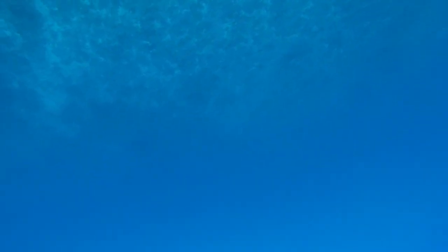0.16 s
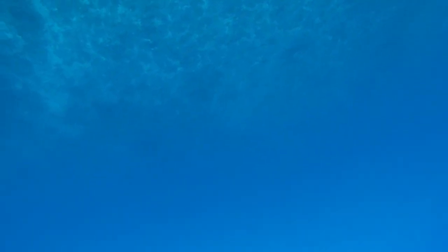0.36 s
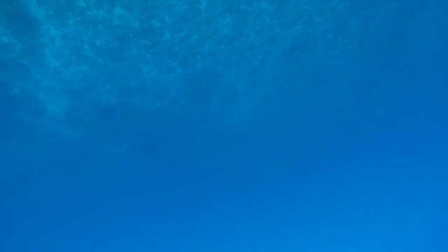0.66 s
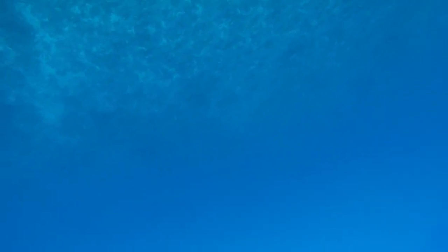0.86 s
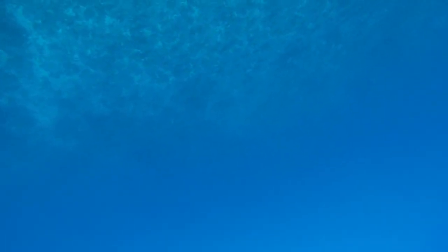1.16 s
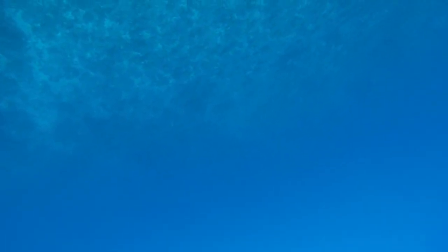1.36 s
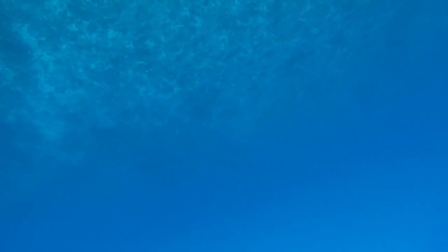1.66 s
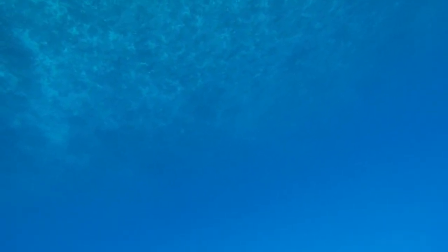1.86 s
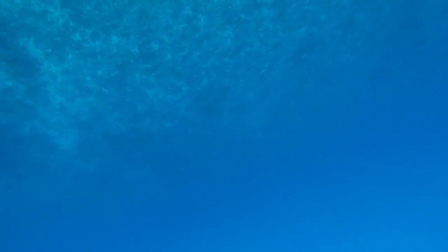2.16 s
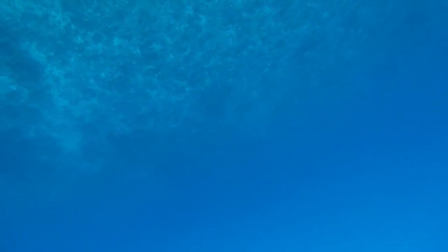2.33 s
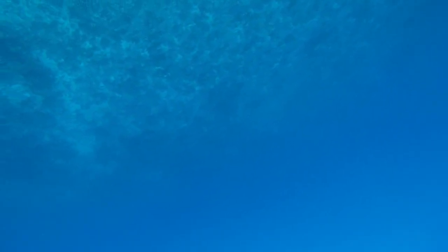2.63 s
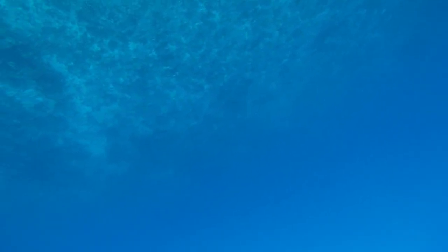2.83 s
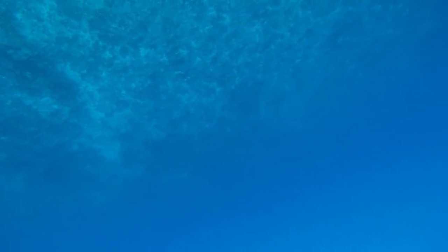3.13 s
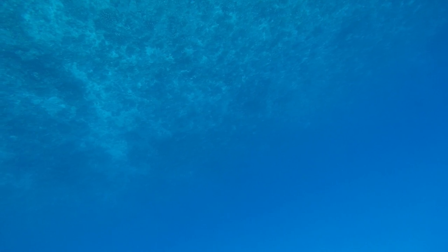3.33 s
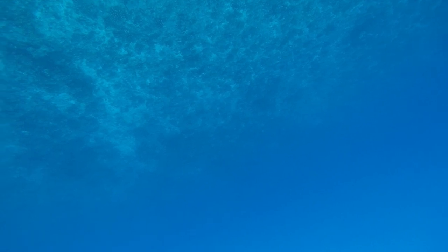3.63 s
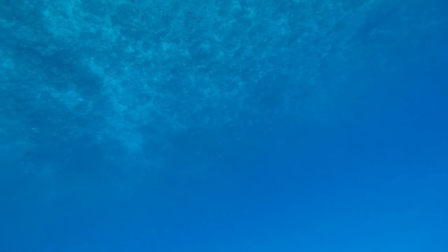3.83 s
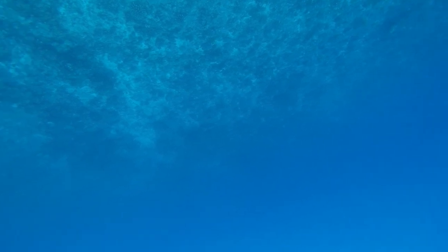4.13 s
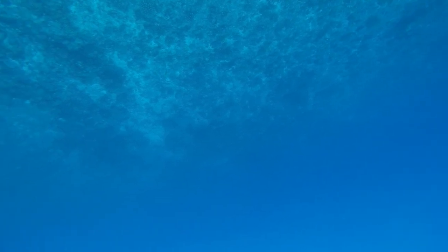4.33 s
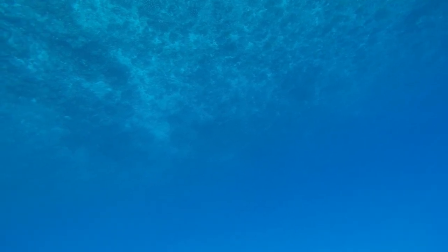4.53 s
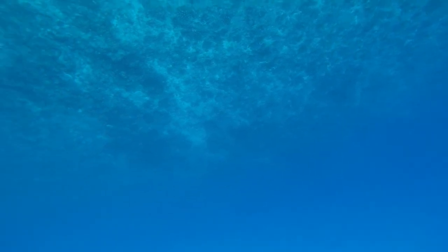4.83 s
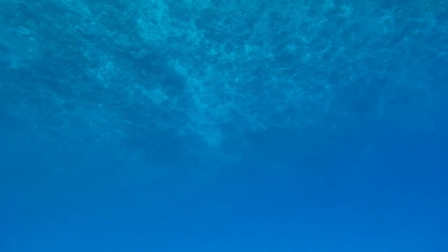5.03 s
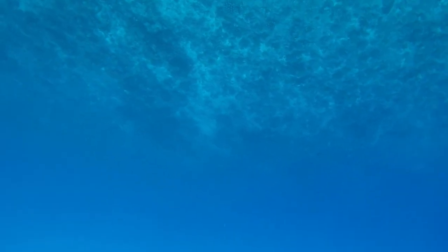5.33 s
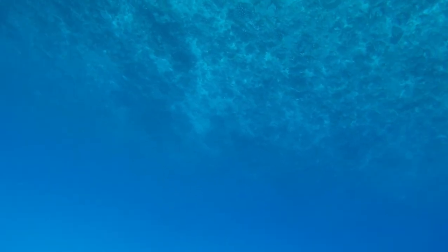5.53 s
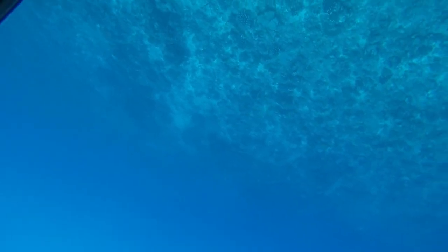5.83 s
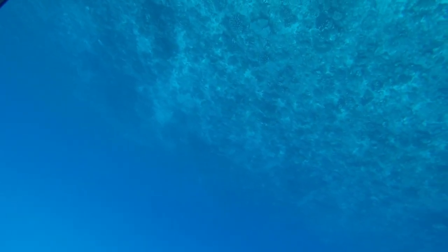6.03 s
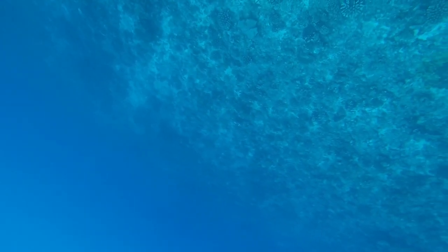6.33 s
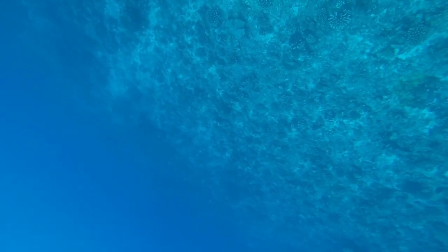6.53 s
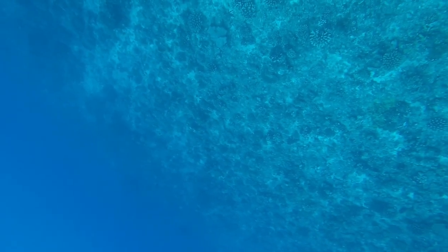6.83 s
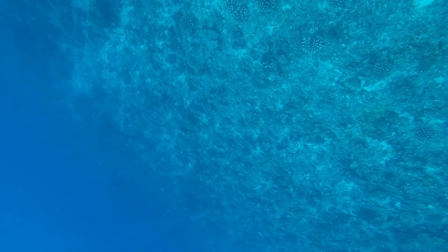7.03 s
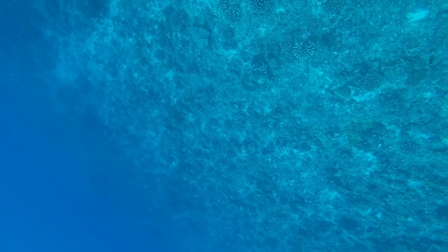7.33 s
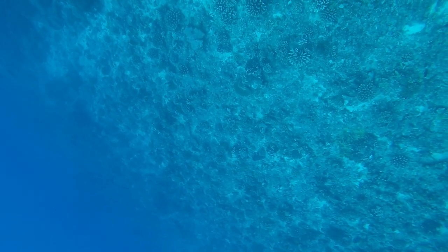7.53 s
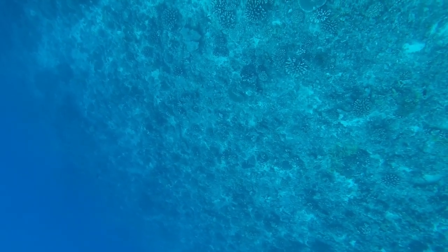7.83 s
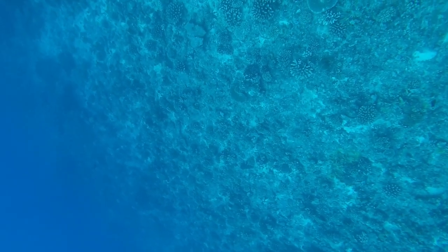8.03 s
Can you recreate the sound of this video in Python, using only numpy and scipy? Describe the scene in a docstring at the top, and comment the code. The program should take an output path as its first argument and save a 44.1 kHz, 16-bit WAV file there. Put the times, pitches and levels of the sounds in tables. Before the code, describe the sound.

Underwater beside a reef, heard from inside a sealed housing. Deep rumbling flow and dull falling glugs come first, over a constant fine crackle of snapping shrimp. The rumble sinks away, leaving crackle and sharp little ticks. Past five seconds, air squeals and hisses through a narrow gap, bursts in a hard ringing pop, and squeaks on. A short low hoot and more glugs follow as the rumble partly returns.

```python
"""Under water beside a reef, inside a camera housing: filtered noise rumbles past as flow, and trapped air
glugs against the case in damped, falling tones. Snapping shrimp crackle all around in short noise bursts.
Air squeezes through a narrow gap in hissing squeals, wavering tones that roughen as their pitch rises.
It lets go with a ringing pop and later leaves in a short low hoot; a limiter ducks the crackle after the pop."""
import sys
import numpy as np
from scipy import signal
from scipy.fft import rfft, irfft, next_fast_len
from scipy.io import wavfile
from scipy.ndimage import uniform_filter1d, minimum_filter1d

SR = 44100
rng = np.random.default_rng(int(sys.argv[2]) if len(sys.argv) > 2 else 0)


def waveform_to_disk(signal):
    """Save audio, clipped to [-1, 1], as 16-bit WAV at the path in sys.argv[1]."""
    frames = np.transpose(np.atleast_2d(signal))
    scaled = np.clip(frames, -1, 1) * 32767
    samples = np.round(scaled).astype(np.int16)
    wavfile.write(sys.argv[1], SR, samples)


N = 360738

# In spectra, density_db is the relative level per Hz.
# likeness of left and right in steady noise: freq_hz, correlation
STEREO_LIKENESS = [(20, 0.16), (300, 0.34), (1700, 1), (3000, 0), (6000, 0), (12000, 0.11)]
# water moving past the case, before a shared lift: time_s, rumble_db, churn_db
FLOW_LEVELS = [(0.0, -34.5, -40.5), (0.48, -30.5, -43.5), (0.73, -35, -45.5), (1.59, -33.5, -45.5),
               (2.89, -43, -45), (3.32, -54.5, -47.5), (4.58, -59, -42), (5.35, -44.5, -42.5),
               (6.08, -47.5, -51), (7.29, -39, -43.5), (7.65, -38, -45.5), (8.18, -44, -47.5)]
# spectrum of the deep rumble: freq_hz, density_db
RUMBLE_SPECTRUM = [(9, -2), (15, 10), (31, 7), (124, -6.5), (204, -33.5), (500, -36.5), (1100, -110)]
# spectrum of the churning: freq_hz, density_db
CHURN_SPECTRUM = [(40, -31), (120, -9), (168, 5), (215, -5.5), (300, -10.5), (450, -16.5), (750, -17),
                  (1500, -41)]
# the reef's crackle as the housing colours it: freq_hz, density_db
REEF_SPECTRUM = [(300, -22), (800, -21.5), (1200, -12), (1640, -5), (2200, -9.5), (3300, -6), (4800, -11.5),
                 (5800, -1.5), (6400, -5.5), (7200, -2.5), (9000, -7), (11000, -20), (14000, -39.5),
                 (16000, -77)]
# how strongly the reef is heard: time_s, boost_db
REEF_NEARNESS = [(0, 2), (1.6, 2.5), (3, 1), (4.2, 3), (6.3, -2), (7.2, 2.5)]
# air pockets knocked into ringing: start_s, level_db, settled_pitch_hz, t60_s
AIR_POCKETS = [(0.106, -21, 148, 0.023), (0.221, -16.5, 121, 0.027), (0.38, -12.5, 106, 0.036),
               (0.392, -6.5, 104, .025), (0.912, -5.5, 130, 0.082), (0.924, -16, 238, 0.063),
               (1.311, -7, 89, 0.057), (1.607, -16.5, 81, 0.041), (2.205, -30, 247, 0.033),
               (2.784, -13, 93, 0.053), (3.748, -28, 225, 0.034), (4.08, -28.5, 170, 0.033),
               (4.43, -25, 210, 0.027), (4.597, -13.5, 165, 0.056), (5.035, -35, 464, 0.043),
               (6.461, -27.5, 166, 0.036), (6.619, -11, 189, 0.047), (6.75, -20.5, 190, .04),
               (7.123, -5, 139, 0.089), (7.131, -17.5, 368, 0.052), (7.315, -20, 148, .03),
               (7.335, -26, 188, 0.054), (7.543, -20.5, 103, 0.037), (8.11, -27.5, 200, 0.043)]
GLUG_START_HZ = 563
GLUG_SETTLE = 0.0573  # time constant of the pitch drop, as a share of the t60
GLUG_RISE_CYCLES = 0.94
# spitting of air with two knocks, with the pop and ahead of the hoot:
# start_s, rise_s, decay_s (time constant), level_db (before the decay)
SPIT_BURSTS = [(0.221, 0.0017, 0.0037, -26.5), (0.9123, 0.0022, 0.0086, -22.5), (5.8309, 0.0012, 0.0072, 3),
               (6.74, 0.033, 0.043, -26.5)]
# spectrum of the spitting: freq_hz, density_db
SPIT_SPECTRUM = [(60, -29), (250, -12.5), (800, 6), (1500, 1), (2500, 0), (4000, -12), (12000, -42)]
# the nearest shrimp snaps: start_s, peak_db (before panning), low_body_db
NEAR_SNAPS = [(0.2217, -22, 1), (0.515, -13, -9), (1.43, -15, -12), (1.508, -10.5, -17),
              (1.659, -16.5, -1.5), (1.812, -19, -12), (2.159, -18, -33), (2.2933, -23, -17),
              (2.7254, -17.5, -4), (3.4436, -17, -28), (3.5356, -21, -14), (3.7061, -18, -13),
              (3.742, -18, -12), (4.1724, -14, -20), (4.2027, -17, -21), (5.245, -18.5, -12),
              (2.855, -16.5, -11.5), (3.057, -18, -1), (3.2543, -14.5, -22), (3.3074, -15, -20),
              (3.3622, -12, -14), (3.5667, -15, 5), (4.091, -15, -5), (4.2863, -17, -8),
              (4.366, -14.5, -28), (4.8472, -16.5, -10), (4.934, -16, -3), (5.656, -12.5, -25),
              (5.7758, -10.5, -2), (6.288, -19, -12), (6.3314, -15, -17), (6.9213, -13, -24),
              (6.9563, -17, -11), (7.0198, -13.5, -9), (7.1731, -5.5, -9.5), (7.284, -12.5, -6.5),
              (7.4782, -17, -17), (0.6492, -22, -12), (1.2256, -18, -14), (1.2771, -19, -12),
              (2.057, -20.5, -28), (4.467, -19, -34), (7.0377, -16.5, -14), (7.2735, -18, -23),
              (7.794, -15.5, -14), (7.9944, -11, -8.5), (8.151, -15, -31)]
# air buzzing through a narrow neck, mostly as a big pocket forms: start_s, length_s, level_db
NECK_BUZZES = [(0.9144, 0.023, -15.5), (1.308, .012, -29), (2.782, 0.012, -34.5), (4.596, 0.01, -27.5),
               (4.937, 0.016, -33)]
BUZZ_HZ, BUZZ_ROUGH = 1316, 0.29
# short squeaks of the gap: start_s, length_s, start_pitch_hz, sink_octaves_per_s, crest_level_db,
# roughness (0 clean, 1 all rasp)
SHORT_SQUEAKS = [(5.138, 0.078, 1940, 3, -45, 0.96), (5.298, 0.039, 4490, 3, -23, 0.7),
                 (5.321, 0.18, 4270, 0.8, -33, 0.9), (5.925, 0.088, 4720, 6, -47, .3),
                 (6.043, 0.09, 1615, -0.5, -44.5, 0.6), (6.345, 0.08, 4400, 1.5, -39, 0.9),
                 (6.512, 0.034, 1980, 2.3, -43, 0), (6.742, 0.125, 1560, 3, -34, 1.04)]
SQUEAK_CREST = 0.16  # loudest after this share of its length
SQUEAK_RISE_DB, SQUEAK_FALL_DB = 2, 1
# puffs of air hissing through the gap: start_s, length_s, level_db (before the fade), fade_db_per_s
AIR_PUFFS = [(5.266, 0.62, -31.5, 16.5), (6.696, 0.1, -39, 106)]
PUFF_RISE_S = 0.033
# spectrum of the hiss in the gap: freq_hz, density_db
GAP_SPECTRUM = [(600, -16), (1100, -4), (1450, 5), (2000, -0.5), (2600, 6), (3400, -6.5), (4200, 13),
                (4900, -8), (5500, 0.5), (7600, 1), (9000, -11.5), (13000, -22.5), (16000, -49)]
# the long squeal before the pop: time_s, pitch_hz, level_db
SQUEAL_BEFORE_POP = [(5.28, 1750, -44), (5.42, 1833, -33.5), (5.54, 1612, -43.5), (5.755, 1386, -39.5),
                     (5.77, 1757, -34.5), (5.832, 1727, -23)]
# the long squeal after the pop: time_s, pitch_hz, level_db
SQUEAL_AFTER_POP = [(6.04, 1642, -57), (6.24, 1315, -48), (6.32, 1503, -49), (6.34, 1770, -33),
                    (6.38, 2090, -28), (6.405, 1740, -28.5), (6.456, 1706, -21.5), (6.472, 1566, -34.5),
                    (6.497, 1180, -40)]
# a whistle sliding down out of the pop: time_s, pitch_hz, level_db
SLIDING_WHISTLE = [(5.845, 3420, -39.5), (5.88, 3200, -43.5), (5.93, 3010, -43), (5.965, 2570, -37),
                   (6.0, 2360, -40), (6.037, 2140, -42)]
# a higher whistle warbling after it, before a shared lift: time_s, pitch_hz, level_db
HIGH_WARBLE = [(6.035, 4280, -52), (6.041, 4060, -32), (6.051, 3690, -41.5), (6.081, 3330, -41),
               (6.111, 3070, -54), (6.129, 3407, -39.5), (6.159, 3240, -48), (6.169, 3360, -39),
               (6.187, 3088, -52), (6.211, 3170, -47), (6.256, 2950, -54)]
# a squeal is nearly clean until its pitch passes a break; this much higher it is all rasp
CALM_ROUGH, ROUGH_SPAN_HZ = 0.15, 326
POP_AT_S = 5.8324
# the air space ringing after the pop: freq_hz, level_db, t60_s
POP_MODES = [(167, 5, .17), (383, -10, .17), (2280, -4, .04)]
# a bubble swelling at the gap in three pushes: start_s, length_s, top_pitch_hz, level_db (before the fall)
BUBBLE_HOOTS = [(6.779, 0.021, 290, -27), (6.797, 0.02, 398, -15.5), (6.814, 0.099, 315.6, -2.5)]
HOOT_RISE_S, HOOT_FALL_DB = 0.004, 22.5
HOOT_HOLD = 0.44  # share of the length before pitch and level fall
HOOT_LIFT, HOOT_SAG = 0.1, 0.55  # shares of the pitch, below its top at the start and at the end
EDGE_HZ = 15900  # low-pass cutoff of the whole sound


def gain_of(db):
    """Decibels to gain."""
    return 10 ** (np.asarray(db) / 20)


def evened(x):
    """Scales to rms 1."""
    return x / np.sqrt(np.mean(x ** 2) + 1e-20)


def read(points, hz):
    """Reads a curve on a log-frequency axis."""
    f, value = np.transpose(points)
    return np.interp(np.log(hz + 1), np.log(f + 1), value)


def add(mix, s, sound):
    """Adds a sound to the mix at time s."""
    part = mix[:, max(round(s * SR), 0):][:, :sound.shape[1]]
    part += sound[:, :part.shape[1]]


def sides(pan_db):
    """Left and right gains for a level difference, left louder when positive."""
    return gain_of(np.array([[pan_db], [-pan_db]]) / 2)


def wander(size, hz):
    """A smooth random curve of about rms 1 that moves about hz times a second."""
    length = next_fast_len(SR + size)
    f = np.fft.rfftfreq(length, 1 / SR)
    smooth = rfft(rng.standard_normal(length)) * np.exp(-(f / hz) ** 2)
    return evened(irfft(smooth, length))[:size]


def colour(x, spectrum, size=2048):
    """Causal filter with the given spectrum: clicks ring after they strike."""
    log_gain = np.log(gain_of(read(spectrum, abs(np.fft.fftfreq(size, 1 / SR)))))
    taps = np.fft.ifft(np.exp(np.conj(signal.hilbert(log_gain)))).real
    return signal.oaconvolve(x, taps[None], axes=1)[:, :x.shape[1]]


def noise(spectrum):
    """Steady stereo noise of rms 1, with left and right alike as the likeness table says."""
    hz = np.fft.rfftfreq(N, 1 / SR)
    a, b = rfft(rng.standard_normal((2, N)))
    same = np.clip(read(STEREO_LIKENESS, hz), -1, 1)
    right = same * a + np.sqrt(1 - same ** 2) * b
    return evened(irfft(np.array([a, right]) * gain_of(read(spectrum, hz)), N))


def late_left(x, lag_s):
    """Through the case the left port hears a sound a little late."""
    return np.array([np.pad(x[0], (round(abs(lag_s) * SR), 0))[:N], x[1]])


def flow(rumble_db=4, churn_db=4, lumpy_db=1.5, gurgle_db=2.5):
    """Eddies push on the case in lumps and stir the air space inside it."""
    s, low_db, mid_db = np.transpose(FLOW_LEVELS)
    t = np.arange(N) / SR
    rumble_level_db = np.interp(t, s, low_db) + rumble_db + lumpy_db * wander(N, 21)
    churn_level_db = np.interp(t, s, mid_db) + churn_db + gurgle_db * wander(N, 20)
    rumble = noise(RUMBLE_SPECTRUM) * gain_of(rumble_level_db)
    churn = noise(CHURN_SPECTRUM) * gain_of(churn_level_db)
    return rumble * sides(1.1) + late_left(churn, lag_s=0.00073) * sides(-1.36)


def snap_burst(t, decay_s):
    """A collapsing cavity: one spike, then a few milliseconds of rattle through the case."""
    burst = 0.54 * rng.standard_normal((2, len(t))) * np.exp(-t / decay_s)
    burst[[0, 1], rng.integers(0, 8, size=2)] += 1
    return burst


def reef(far_db=-45.5, near_db=-43.5, per_s=400, spread_db=6.0, variety_db=4, count=24):
    """Countless far shrimp merge into a sizzle; nearer ones tick in voices of different brightness."""
    t, ticks = np.arange(400) / SR, np.zeros((2, N))
    for _ in range(count):
        at = np.flatnonzero(rng.random(N) < per_s / count / SR)
        train = np.zeros((1, N))
        train[0, at] = gain_of(spread_db * np.minimum(rng.exponential(1, N)[at], 2.7))
        brightness = [(2500, rng.normal(-2, variety_db)), (7000, 0)]
        tick = colour(snap_burst(t, 0.0014), brightness)
        ticks += signal.oaconvolve(train, tick * sides(rng.normal(0, 5.4)), axes=1)[:, :N]
    flurries = gain_of(3 * wander(N, 21))
    far = gain_of(far_db) * noise(REEF_SPECTRUM)
    near = gain_of(near_db) * evened(colour(ticks, REEF_SPECTRUM) * flurries)
    return (far + near) * sides(-3.5)


def glugs(upper=1.93, upper_db=-15, thud_db=-12):
    """An air pocket swells, drops quickly in pitch and rings on at its low note; the case thuds softly along."""
    out, t = np.zeros((2, N)), np.arange(SR // 4) / SR
    for s, db, hz, t60 in AIR_POCKETS:
        pan_db = read([(90, 4.5), (130, -8.5), (200, -9.5)], hz)  # the deepest lean left, higher ones right
        pitch_hz = hz + (GLUG_START_HZ - hz) * np.exp(-t / (GLUG_SETTLE * t60))
        phase = 2 * np.pi * np.cumsum(pitch_hz) / SR
        swell = (1 - np.exp(-(t * hz / GLUG_RISE_CYCLES) ** 2)) * gain_of(-60 * t / t60)
        swell /= swell.max()
        pocket = np.sin(phase) + gain_of(upper_db) * swell * np.sin(upper * phase)
        thud = gain_of(thud_db) * swell * wander(len(t), hz) * np.sin(2 * np.pi * 2 * hz * t)
        add(out, s, gain_of(db) * sides(pan_db) * swell * (pocket + thud))
    return out


def spits():
    """Water and air spit through the gap together in a broad, dull burst."""
    level, t = np.zeros((1, N)), np.arange(SR // 4) / SR
    for start, rise_s, decay_s, db in SPIT_BURSTS:
        burst = np.minimum(t / rise_s, 1) ** 2 * np.exp(-t / decay_s)
        add(level, start, (gain_of(db) * burst)[None])
    return noise(SPIT_SPECTRUM) * level


def snaps(body_db=-10, bright_db=9, decay_s=0.0016, linger=0.25):
    """The closest shrimp: sharp, bright cracks, the fuller ones rattling longer."""
    out, t = np.zeros((2, N)), np.arange(900) / SR
    for s, db, low_db in NEAR_SNAPS:
        fullness_db = low_db - body_db
        tilt = [(2000, min(fullness_db, 10)), (6000, 0.0046), (9000, 0), (14000, bright_db)]
        spectrum = [(hz, d + read(tilt, hz)) for hz, d in REEF_SPECTRUM]
        crack = colour(snap_burst(t, decay_s * gain_of(linger * fullness_db)), spectrum)
        add(out, s, gain_of(db) * crack / abs(crack).max(1, keepdims=True))
    return out * sides(-1.1)


def buzzes(flutter_hz=260):
    """Air in a narrow neck: a brief fluttering tone that starts at once, holds and dies away."""
    out = np.zeros((2, N))
    for s, length, db in NECK_BUZZES:
        t = np.arange(0, length, 1 / SR)
        turn = np.exp(2j * np.pi * BUZZ_HZ * t)
        drift = [wander(len(t), flutter_hz) + 1j * wander(len(t), flutter_hz) for _ in out]
        tone = evened((turn * (1 + BUZZ_ROUGH * np.array(drift))).real)
        envelope = np.interp(t, [0, 0.002, 0.7 * length, length], [0, 1, 1, 0])
        add(out, s, gain_of(db) * tone * envelope)
    return out


def whistle(hz, db, rough, waver=0.00676):
    """One mode of the air gap: a clean line when steady, a fuzzy band when it flutters."""
    size, rough = len(hz), np.clip(rough, 0, 1)
    turn = np.exp(2j * np.pi * np.cumsum(hz * (1 + waver * wander(size, 120))) / SR)
    rasp_hz = min(0.125 * hz.mean(), 300)
    flutter = wander(size, rasp_hz) + 1j * wander(size, rasp_hz)
    tone = (turn * (np.sqrt(2 * (1 - rough ** 2)) + rough * flutter)).real
    return tone * gain_of(db) * signal.windows.tukey(size, 0.06) * sides(-1.8)


def squeak(start, length, top_hz, sink, db, rough, overtone=2.05):
    """A brief leak swells, then fades while its pitch slides; only low squeaks have a clear overtone."""
    t = np.arange(0, length, 1 / SR)
    hz = top_hz * 2 ** (-sink * t)
    level_db = db - np.interp(t / length, [0, SQUEAK_CREST, 1], [SQUEAK_RISE_DB, 0, SQUEAK_FALL_DB])
    overtone_db = read([(1700, -8.5), (4000, -40)], top_hz)
    return start, whistle(hz, level_db, rough) + whistle(overtone * hz, level_db + overtone_db, rough)


def squeal(curve, break_hz, overtone, overtone_db, level_db=0, rasp_lift_db=15, overtone_rough=0.35):
    """Pressure lifts the pitch; past the break the tone turns rough and feeds the gap's second mode."""
    s, *columns = np.transpose(curve)
    t = np.arange(s[0], s[-1], 1 / SR)
    hz, db = (np.interp(t, s, c) for c in columns)
    rough = np.clip(CALM_ROUGH + np.maximum(hz - break_hz, 0) / ROUGH_SPAN_HZ, 0, 1)
    upper_db = db + overtone_db - rasp_lift_db * (1 - rough)
    upper = whistle(overtone * hz, upper_db, rough + overtone_rough)
    return s[0], gain_of(level_db) * (whistle(hz, db, rough) + upper)


def third_mode(curve, db, ratio=3.04, follow=0.304, rough=1.0):
    """A faint, smeared high line glides above a long squeal, following its level swings only in part."""
    s, hz, level_db = np.transpose(curve)
    t = np.arange(s[0], s[-1], 1 / SR)
    swing_db = np.interp(t, s, level_db - level_db.mean())
    return s[0], whistle(ratio * np.interp(t, s, hz), db + follow * swing_db, rough)


def squeaks():
    """All the whistling of the air gap: short squeaks, long squeals and their upper modes."""
    out = np.zeros((2, N))
    for row in SHORT_SQUEAKS:
        add(out, *squeak(*row))
    add(out, *squeal(SQUEAL_BEFORE_POP, break_hz=1554, overtone=2.067, overtone_db=1.5))
    add(out, *third_mode(SQUEAL_BEFORE_POP, db=-45.5))
    add(out, *squeal(SLIDING_WHISTLE, break_hz=3300, overtone=2.2, overtone_db=-3))
    add(out, *squeal(HIGH_WARBLE, break_hz=4040, overtone=2, overtone_db=-20, level_db=4))
    add(out, *squeal(SQUEAL_AFTER_POP, break_hz=1655, overtone=2.03, overtone_db=-5, overtone_rough=0.8))
    add(out, *third_mode(SQUEAL_AFTER_POP, db=-56))
    return out


def hiss(grit_db=2.0):
    """Turbulent air in the same gap, spitting as it goes."""
    level = np.zeros((1, N))
    for start, length, db, fade_db_per_s in AIR_PUFFS:
        t = np.arange(0, length, 1 / SR)
        puff = np.minimum(t / PUFF_RISE_S, 1) * gain_of(db - fade_db_per_s * t)
        add(level, start, puff[None])
    return noise(GAP_SPECTRUM) * level * gain_of(grit_db * wander(N, 300))


def ring(modes, t):
    """Damped sines of a ringing air space."""
    return sum(gain_of(db - 60 * t / t60) * np.sin(2 * np.pi * hz * t) for hz, db, t60 in modes)


def pop(pop_db=15, pinch_s=0.00351, open_hz=1750, shut_hz=900):
    """A bubble pinches off with a hard pop and leaves the air space ringing."""
    out, t = np.zeros((2, N)), np.arange(SR // 4) / SR
    closing = np.minimum(t / pinch_s, 1)
    phase = 2 * np.pi * np.cumsum(open_hz + (shut_hz - open_hz) * closing) / SR
    pinch = np.sqrt(4 * closing * (1 - closing)) * np.sin(phase)
    ringing = ring(POP_MODES, t) * np.minimum(t / 0.002, 1) * sides(4)
    add(out, POP_AT_S, gain_of(pop_db) * pinch + ringing)
    return out


def hoots(octave_db=-29, shudder=0.13):
    """A swelling bubble hoots with a lifting pitch, then sags and dies away."""
    out = np.zeros((2, N))
    for start, length, hz, db in BUBBLE_HOOTS:
        t = np.arange(0, length, 1 / SR)
        spent = np.interp(t / length, [HOOT_HOLD, 1], [0, 1])
        bend = np.interp(t / length, [0, HOOT_HOLD, 1], [1 - HOOT_LIFT, 1, 1 - HOOT_SAG])
        phase = 2 * np.pi * np.cumsum(hz * bend) / SR
        tone = np.sqrt(2) * (np.sin(phase) + gain_of(octave_db) * np.sin(2 * phase))
        tone *= 1 + shudder * wander(len(t), 330)  # the bubble's wall trembles
        edges = np.minimum(np.minimum(t, length - t) / HOOT_RISE_S, 1)
        add(out, start, tone * edges * gain_of(db - HOOT_FALL_DB * spent ** 2) * sides(-4))
    return out


def scene():
    """Flow, reef and escaping air together; the sounds of air reach the left port late."""
    nearness = gain_of(np.interp(np.arange(N) / SR, *np.transpose(REEF_NEARNESS)))
    water = flow() + nearness * reef() + snaps()
    pockets = late_left(glugs() + buzzes() + hoots(), lag_s=0.00025)
    gap_air = late_left(spits() + squeaks() + hiss() + pop(), lag_s=0.00058)
    return water + pockets + gap_air


def record(dry, ceiling_db=0):
    """A peak limiter that falls at once, holds for 50 ms and then recovers; then the band limit."""
    peak_db = 20 * np.log10(abs(dry).max(0) + 1e-9)
    held_db = -minimum_filter1d(-peak_db, size=2201, origin=1100)
    recovery_db = 115 * np.arange(N) / SR  # 115 dB per second
    falling_db = np.maximum.accumulate(held_db + recovery_db) - recovery_db
    over_db = np.maximum(falling_db - ceiling_db, 0)
    duck_db = uniform_filter1d(-minimum_filter1d(-over_db, size=32), size=32)
    ducked = dry / gain_of(duck_db)
    low_pass = signal.firwin(255, EDGE_HZ, window=("kaiser", 9), fs=SR)
    return signal.oaconvolve(ducked, low_pass[None], "same")


dry = scene()
out = record(dry)
waveform_to_disk(out)
```